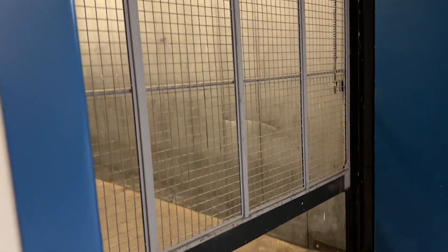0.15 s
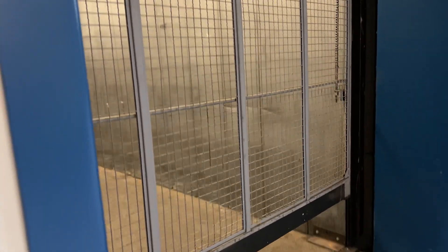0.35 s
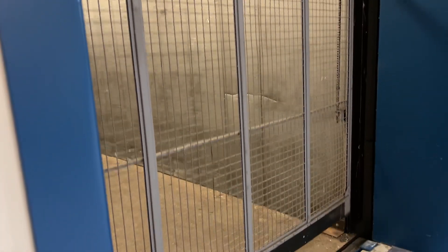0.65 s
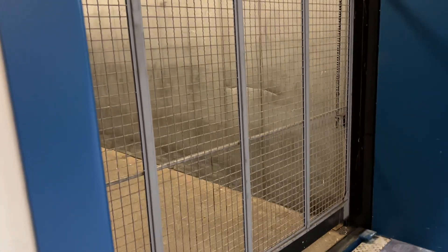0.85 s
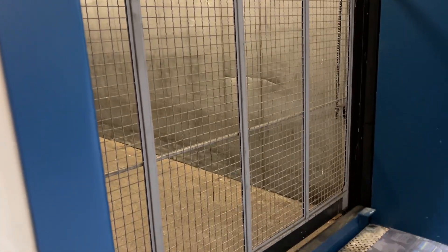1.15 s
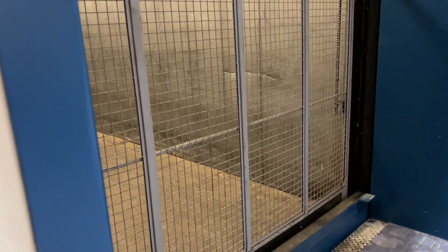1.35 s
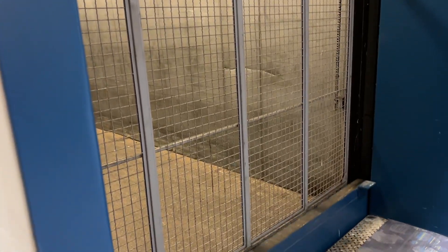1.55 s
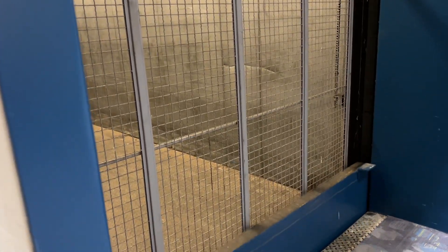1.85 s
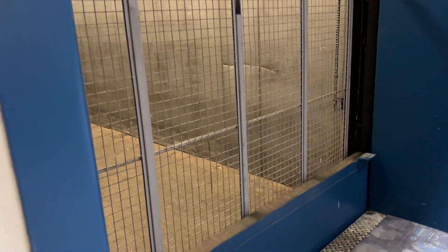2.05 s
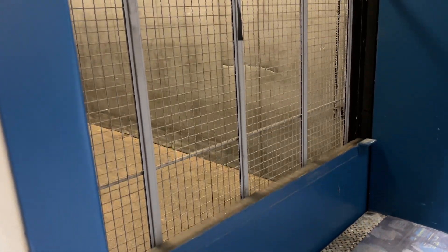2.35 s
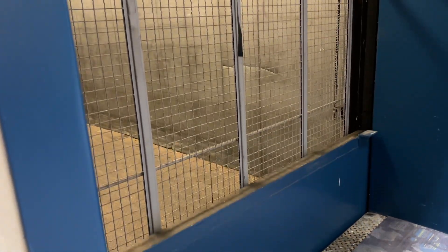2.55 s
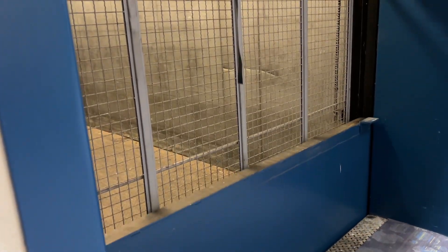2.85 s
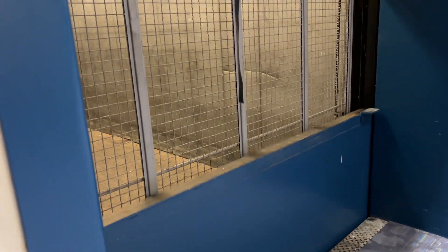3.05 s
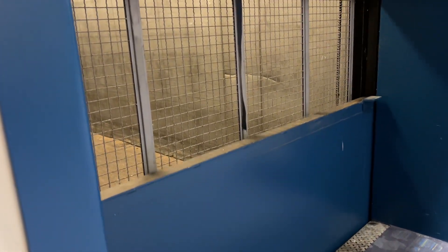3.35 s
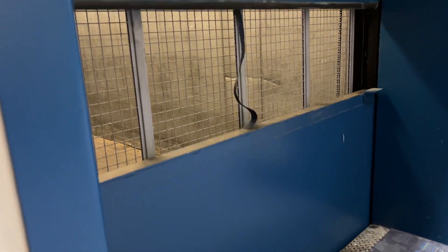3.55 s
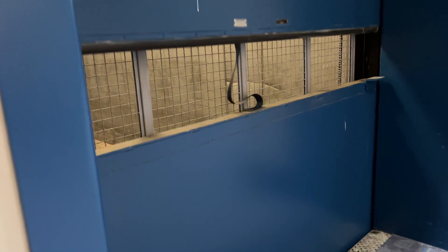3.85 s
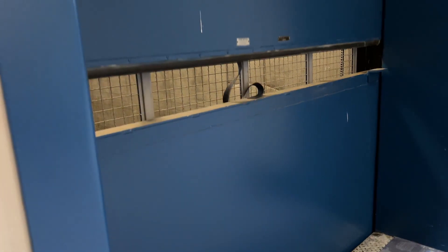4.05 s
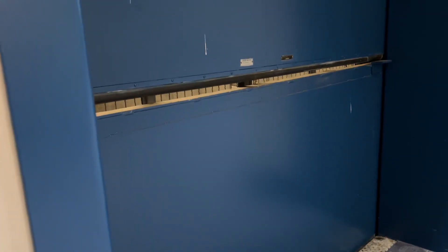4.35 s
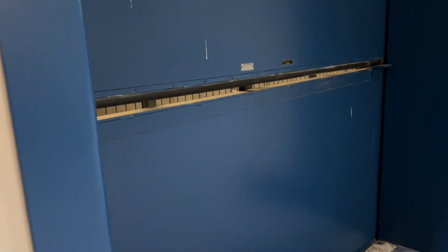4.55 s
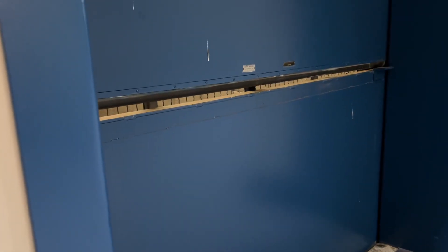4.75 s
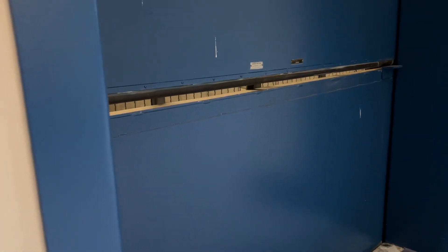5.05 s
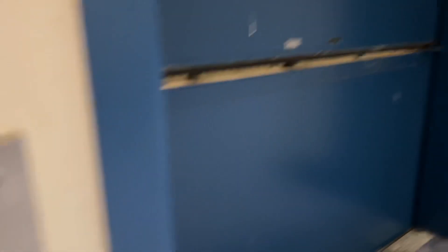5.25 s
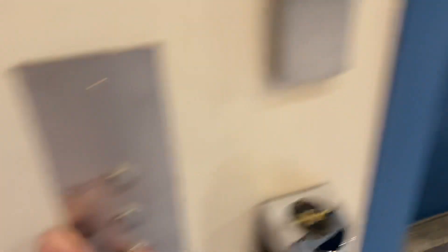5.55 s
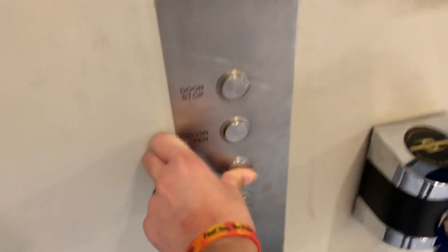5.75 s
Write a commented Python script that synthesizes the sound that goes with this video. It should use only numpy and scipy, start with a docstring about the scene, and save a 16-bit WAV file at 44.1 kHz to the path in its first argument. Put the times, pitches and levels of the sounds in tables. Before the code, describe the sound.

Heavy steel elevator doors close under a humming motor, with metallic clanks, a loud midway crash, a final bang and latch snap, then a button press.

```python
"""A mesh gate runs down on its chain over ventilation noise and an electrical hum, then lands and rings.
A motor runs up and draws two steel door panels together: its tones are multiples of its turning rate.
The panels' rumble, drone and scrape are filtered noise; they clang over a catch halfway and meet with a bang.
Blows are noise dying band by band in a large hard-walled building; small parts ring as damped modes.
The latch snaps home, and at last a button is pressed on its plate."""
import sys
import numpy as np
from scipy import signal
from scipy.fft import rfft, irfft, next_fast_len
from scipy.io import wavfile

SR = 44100
rng = np.random.default_rng(int(sys.argv[2]) if len(sys.argv) > 2 else 0)


def unload_audio(sound):
    """Save the sound as a 16-bit wav file, at the path given as the first command line argument."""
    columns = np.transpose(np.atleast_2d(sound))
    # keep every value between -1 and 1, then stretch to whole-number steps
    steps = np.round(np.clip(columns, -1, 1) * 32767)
    wavfile.write(sys.argv[1], SR, steps.astype(np.int16))


N = 260183

# Stereo width of the sound field: (frequency [Hz], side against mid [dB])
WIDTH = [(30, -13), (120, -17.5), (250, -11.5), (500, -6), (1000, -2.5), (2000, -1), (4000, -1), (5800, 0),
         (7500, -5.5), (9000, 3), (10300, -1), (11700, -1), (12600, -16), (14200, -16.5), (15200, -2.5)]
# Stereo balance: (frequency [Hz], left against right [dB])
LEFTWARD = [(60, -0.5), (250, -1.1), (500, 0.8), (1000, 1.5), (1600, 0.7), (2100, -1), (3900, 1),
            (5050, 8.5), (6000, 2.5), (7200, 1.5), (8200, 1), (9500, 0.5)]
# Resonances of the door sheets and their guide rails: (frequency [Hz], width [Hz], level [dB])
SHEET_PEAKS = [(97.6, 6.3, 9), (150, 2.4, 3.5), (285, 15, 1.5), (351, 120, 0.5), (407, 77, 5),
               (632, 4.9, 8), (806, 5.7, 1.5), (1014, 12, 2), (1095, 6.7, -1), (1406, 17, 2.5),
               (1345, 87, 6), (1458, 110, 8), (1720, 25, 6), (1940, 16, -4.5), (1800, 29, -4),
               (2210, 49, -5.5), (2280, 140, -5), (3760, 320, -0.5)]
# Range and strength of small parts' modes: (frequency [Hz], level per mode [dB])
CLINK_COLOUR = [(700, -3.5), (1500, 7), (2400, -1.5), (3300, -5), (5000, -14.5), (7000, -12.5)]
CLINK_T60_S, CLINK_SWELL_S = 0.07, 0.0016

# Ventilation spectrum: (frequency [Hz], density [dB per Hz])
AIR = [(20, -52.5), (35, -11), (60, 5.5), (90, -5.5), (140, -7.5), (220, -11.5), (330, -14.5), (480, -15.5),
       (650, -21.5), (1100, -27), (2200, -34), (3500, -42), (4600, -39.5), (5300, -38), (6500, -50.5),
       (9000, -64.5), (15500, -63)]
AIR_DB = -38.5
# Partials of the electrical hum: (frequency [Hz], level [dB])
MAINS_HUM = [(119.8, -50), (360.5, -58), (479.3, -54)]
# The hum grows as the microphone nears the button plate
HUM_NEAR_S, HUM_APPROACH_S, HUM_FAR_DB = 5.4, 0.5, -4.5

# Gate rollers' spectrum: (frequency [Hz], density [dB per Hz])
GATE_ROLL = [(20, -42), (35, -37), (75, 4), (120, 3.5), (200, -0.5), (400, -6.5), (490, -16.5), (610, -5),
             (750, -8.5), (1400, -19.5), (2200, -17), (2800, -24.5), (6000, -66)]
# Spectrum of the chain paying out: (frequency [Hz], density [dB per Hz])
CHAIN_HISS = [(1500, -16), (3000, 12), (5000, 6), (8000, 4), (11500, 0), (14000, -4.5), (15200, 3),
              (16000, -29)]
GATE_ROLL_DB, CHAIN_HISS_DB = -38, -61
# Tones of the gate's drive: (frequency [Hz], level [dB])
GATE_WHINE = [(199, -47.5), (633, -52.5), (716, -70), (1044, -61.5)]
# The gate lands and bounces: (time [s], level [dB])
GATE_LANDING = [(0.657, -37), (0.675, -49), (0.69, -51), (0.722, -52)]
# Modes of the gate's mesh: (frequency [Hz], level [dB], decay time T60 [s])
MESH_MODES = [(242.6, 9, 0.13), (298, 11.5, 0.12), (1415, 0, 0.24), (1950, -8, 0.61), (2440, -12, 0.19),
              (3140, -5, 0.2), (3420, -13, 0.15), (3962, -16, 0.4), (6500, -14, 0.95), (6760, -17.5, 0.8),
              (7140, -8, 0.16), (8560, -4, 0.076), (11600, -7, 0.049), (13180, -15, 0.1)]

# The gate's chain jingles: (time [s], level [dB], decay time T60 [s])
JINGLES = [(0.3, -66, 0.25), (0.47, -56, 0.2), (0.631, -50, 0.069), (2.325, -51, 0.12), (3.554, -59, 0.08)]
# Jingle spectrum: (frequency [Hz], density [dB per Hz])
JINGLE_COLOUR = [(3000, -17), (7000, -5), (12000, -13), (14000, 4), (16000, -14)]
# Small parts click: (time [s], level [dB])
CLICKS = [(0.468, -55), (0.688, -42), (0.719, -45), (0.746, -48), (2.324, -39), (3.351, -49),
          (3.554, -38.5), (4.583, -48.5)]
# Runs of chain links over the sprocket: (time [s], length [s], level [dB])
CHAIN_RUNS = [(3.175, 0.75, -52), (4.616, 0.27, -58.5)]
# Spectrum of clicks and links: (frequency [Hz], density [dB per Hz])
TICK_COLOUR = [(300, -38), (1000, 0), (2200, 10.5), (3500, -6.5), (5300, 7), (7000, 4), (8700, 0.5),
               (13000, -14), (16000, -31)]
CLICK_T60_S, LINK_T60_S = 0.066, 0.056
LINK_S = 0.026   # mean interval between links

# The door drive switches on, runs up to speed and, once the panels have met, runs down
START_S, ENGAGE_S, RUN_UP_S = 0.62, 0.016, 0.18
STOP_S, RUN_DOWN_DB_PER_S = 4.265, 23
# The motor runs up, then labours and eases with the load: (time [s], turning rate [Hz])
MOTOR_SPEED = [(0.62, 52), (0.95, 65), (1.25, 70.3), (1.55, 73), (2.0, 74.2), (2.6, 73.8), (3.05, 75.2),
               (3.3, 74.7), (3.8, 76.1), (4.1, 76.3), (4.3, 74.8), (4.9, 75.5)]
# One list for each of the first four orders, of its loud stretches: (level [dB], from [s], until [s])
MOTOR_ORDERS = [
    [(-34, 0.95, 1.4), (-36, 3.15, 4), (-32, 4.45, 5.0)],
    [(-37, 2.9, 2.2), (-31.5, 2.89, 3.1), (-31, 3.7, 3.88), (-31.5, 4.15, 4.75)],
    [(-35, 1.36, 2.28), (-33.5, 2.53, 2.89), (-38, 3.4, 3.85)],
    [(-34, 1.75, 2.55), (-31.5, 2.887, 3.21)],
]
ORDER_FADE_DB_PER_S, ORDER_RANGE_DB = 72, 14   # outside a stretch an order sinks this fast and this far

# Spectrum of the panels' rumble: (frequency [Hz], density [dB per Hz])
RUMBLE = [(20, -31), (33, -9.5), (45, -6.5), (62, 2.5), (85, 7.5), (115, 9.5), (160, 7.5), (220, -1.5),
          (500, -69)]
RUMBLE_DB, RUMBLE_GROWTH_DB_PER_S = -38.5, 2.07   # level at the start; growth afterwards
# The heavy panels shudder after a jolt: (time [s], level [dB])
SHUDDERS = [(0.68, -31.5), (2.39, -27.5), (3.3, -32.5), (4.28, -40.5)]
SHUDDER_RISE_S, SHUDDER_T60_S = 0.27, 1.8
# Spectrum of the rollers' drone: (frequency [Hz], density [dB per Hz])
DRONE = [(90, -30.5), (150, -15), (260, 1.5), (330, -0.5), (400, -7), (520, -10), (800, -25.5), (2000, -59)]
DRONE_DB, DRONE_SLOW_DB = -33.5, -13   # at full speed; change at starting speed
# Spectrum of the guide shoes' scraping: (frequency [Hz], density [dB per Hz])
SCRAPE = [(250, -23), (550, 1), (900, 2.5), (1150, -6), (1430, -10.5), (1700, -10), (2200, -6),
          (3200, -19.5), (5200, -24), (8000, -34), (13000, -53.5), (16000, -58)]
# Course of the scraping: (time [s], level [dB])
SCRAPE_LEVEL = [(0.65, -40.5), (0.95, -42.5), (1.2, -40.5), (1.65, -40), (2.25, -38), (2.9, -39),
                (3.3, -40), (3.8, -43), (4.05, -41.5), (4.4, -37)]
# Level of the moving panels' loudest clink; how far the others may fall below it
ROLLING_CLINK_DB, ROLLING_SPREAD_DB = -41, 10.5

# Steel blows: (time [s], level [dB], brightness [dB per octave], sizzle [dB], rise [s],
# ring T60 [s], hall against ring [dB])
BLOWS = [(0.643, -32.5, -1.5, 4, 0.0031, 0.22, -11.5), (0.655, -32, 5.5, 2, 0.003, 0.29, -19.5),
         (0.698, -30.5, -2, 0, 0.0038, 0.15, -20), (0.729, -30.5, -5.5, -1, 0.006, 0.24, -25),
         (2.315, -27.5, 0.3, 1, 0.007, 0.42, 3.5), (2.397, -15, 1, 9, 0.021, 0.66, -6.5),
         (2.50, -28.5, 1, -8, 0.029, 0.32, -10), (4.047, -40, 6, -12, 0.0023, 0.23, -9.5),
         (4.098, -29, -0.2, 7, 0.008, 0.28, -5.5), (4.151, -27, 3, -14, 0.01, 0.73, -16),
         (4.262, -21.5, 0.2, -12, 0.0063, 0.39, -15), (4.325, -28.5, -13, -3, 0.0076, 0.1, -8),
         (4.431, -53, 9.5, -15, 0.006, 0.33, -23)]
# Spectrum of struck sheet steel: (frequency [Hz], density [dB per Hz])
STEEL = [(22, -20.5), (40, 3), (90, -0.5), (180, 3), (340, 1.5), (560, -6.5), (900, -4.5), (1500, -12.5),
         (2200, -8.5), (2800, -16.5), (3700, -18), (4900, -24.5), (7000, -28), (12000, -35.5), (16000, -53)]
# Reverberation of the hall: (frequency [Hz], decay time T60 [s])
HALL_T60 = [(50, 2.2), (300, 1.76), (1500, 2.02), (4000, 1.1), (8000, 0.98), (15000, 0.68)]
BOOM_DB, BOOM_PER_DB, MEDIUM_BLOW_DB = 3, -0.75, -28.5   # light blows are mostly thud, hard ones mostly clang
# A brief low swell, mostly a panel at a low resonance, near 118 Hz the starting motor's hum: (time [s],
# frequency [Hz], level [dB], half length [s])
BOOMS = [(0.665, 275, -27.5, 0.0092), (0.736, 299, -28.5, 0.012), (0.87, 59, -30, 0.11),
         (1.135, 118.3, -27, 0.054), (1.36, 391.4, -33, 0.067), (1.57, 118, -29.5, 0.032),
         (1.73, 60.6, -30.5, 0.032), (2.03, 391, -34.5, 0.14), (2.12, 340.4, -32.5, 0.097),
         (2.5, 48.7, -27.5, 0.08), (2.55, 87.1, -18.5, 0.019), (3.28, 284, -28.5, 0.037),
         (3.64, 277.8, -32.5, 0.13), (3.7, 96, -49, 0.3), (3.75, 248.3, -35.5, 0.15),
         (4.2, 328, -28, 0.028), (4.28, 272, -29, 0.047), (4.285, 321, -25.5, 0.026),
         (4.335, 454, -28, 0.02)]

# After a jolt the gate's mesh rattles ever more weakly: (time [s], level [dB], fade [dB per s])
RATTLES = [(0.672, -34, 60), (2.43, -25, 52)]
# Spectrum of the wires' ticking: (frequency [Hz], density [dB per Hz])
RATTLE_COLOUR = [(500, -13.5), (1400, 3.5), (2300, 9), (3000, 2.5), (3700, 4.5), (5000, -11.5), (6600, -4),
                 (9000, -16), (14000, -28)]
RATTLE_GAP_S, RATTLE_T60_S = 0.02, 0.03
MESH_CLINK_DB = -2   # clinks against the wires' ticking

# Guide shoes scuff over rail joints: (time [s], level [dB], decay time T60 [s])
SCUFFS = [(1.19, -50, 0.3), (1.48, -45.5, 0.12), (1.535, -51, 0.13), (1.758, -42, 0.41), (1.884, -41, 0.27),
          (1.927, -41.5, 0.21), (1.998, -39, 0.26), (2.05, -45, 0.17), (2.15, -56, 0.25),
          (2.245, -53.5, 0.34), (3.55, -47, 0.11)]
# Scuff spectrum: (frequency [Hz], density [dB per Hz])
SCUFF_COLOUR = [(500, 3.5), (1400, 8), (2200, 12), (3500, 0.5), (5300, 0), (7500, -6.5), (9000, -9),
                (13000, -22.5), (16000, -32)]
# Guide shoes squeak: (time [s], frequency [Hz], level [dB], half length [s])
SQUEAKS = [(1.255, 4307, -58, 0.04), (1.265, 6030, -64, 0.05), (1.77, 1997, -43, 0.024),
           (1.82, 2010, -52, 0.04), (1.92, 1680, -50.5, 0.044), (1.94, 2037, -54.5, 0.11),
           (4.125, 2180, -41, 0.015)]

# The panels knock against the catch and their stops: (time [s], level [dB], decay time T60 [s])
KNOCKS = [(2.368, -37, 0.06), (2.392, -27, 0.044), (2.413, -30, 0.06), (2.424, -34, 0.05),
          (2.444, -26, 0.085), (2.492, -31, 0.078), (2.515, -35, 0.05), (2.543, -31.5, 0.096),
          (2.61, -32, 0.05), (2.665, -39, 0.045), (4.108, -42.5, 0.05), (4.163, -28.5, 0.06),
          (4.186, -26.5, 0.05)]
# Spectrum of the knocks' crack: (frequency [Hz], density [dB per Hz])
KNOCK_COLOUR = [(150, -8), (350, 2), (600, 2), (1500, 6.5), (2500, -15), (3800, -7), (5500, -7),
                (12000, -42)]
# Modes of a knocked panel: (frequency [Hz], level [dB], decay time T60 [s])
PANEL_MODES = [(320.6, 3, 0.22), (341, -4, 0.47), (445, -8, 0.16), (605.6, -5.5, 0.31), (902, -12, 0.29),
               (1090, -5.5, 0.3), (1320, -9.5, 0.2), (1610, -8, 0.3), (1787, -5.5, 0.15), (1980, -13, 0.3),
               (2500, -16.5, 0.3)]

# The latch snaps home: (time [s], level [dB], decay time T60 [s])
LATCH = [(4.153, -30.5, 0.1), (4.257, -25, 0.082), (4.265, -17.5, 0.035)]
# Spectrum of the latch's click: (frequency [Hz], density [dB per Hz])
LATCH_COLOUR = [(2000, -5.5), (3300, -25), (4400, -4), (5100, -4), (5600, -3), (6500, 5.5), (7700, -12),
                (8700, 2.5), (10500, -8), (11500, -26), (12800, -12.5), (14200, -26), (15100, -17.5),
                (16000, -17.5)]
# Modes of the latch: (frequency [Hz], level [dB], decay time T60 [s])
LATCH_MODES = [(4550, -19, 0.15), (5090, -12, 0.12), (6300, -8.5, 0.12), (6840, -9, 0.079),
               (8050, -11, 0.12), (9130, -8, 0.068), (12100, -16.5, 0.035), (12950, -9, 0.052),
               (13400, -24.5, 0.09), (15000, -23, 0.062)]

# The panels' edges slam together and rebound: (time [s], level [dB], decay time T60 [s])
SLAMS = [(4.266, -23.5, 0.04), (4.278, -26.5, 0.04), (4.292, -27, 0.05), (4.341, -35, 0.068)]
# Modes of the steel edges: (frequency [Hz], level [dB], decay time T60 [s])
EDGE_MODES = [(268, -5, 0.2), (425.7, -4.5, 0.45), (563, -5, 0.23), (797, -5.5, 0.3), (1033, -22, 0.3),
              (1303, -15, 0.37), (1360, -15.5, 0.15), (1765, -10.5, 0.23), (1867, -6.5, 0.277),
              (1900, -14, 0.14), (2040, -7.5, 0.13), (2180, -10.5, 0.18), (2320, -7, 0.14)]
SLAM_CRACK_DB = 1

# A hand presses the button and knocks on its plate: (time [s], level [dB], decay time T60 [s])
BUTTON = [(5.693, -38, 0.05), (5.707, -37.5, 0.07), (5.883, -42, 0.15)]
# Button spectrum: (frequency [Hz], density [dB per Hz])
BUTTON_COLOUR = [(200, 13), (700, 9), (1400, -3), (2200, 0), (2700, -11), (3300, -2.5), (4500, -16),
                 (7500, -20.5), (15000, -28)]

CUTOFF_HZ = 15600


def from_db(db):
    """A level in decibels corresponds to an amplitude ratio of 10 to the power level / 20."""
    return 10 ** (np.asarray(db) / 20)


def rms_one(x):
    """Dividing a signal by its root mean square gives it unit power."""
    return x / np.sqrt(np.mean(x ** 2) + 1e-20)


def clock():
    """The time of a sample is its index divided by the sampling rate [s]."""
    return np.arange(N) / SR


def in_time(rows):
    """Slow changes are interpolated linearly in time, one curve per column."""
    s, *columns = np.transpose(rows)
    return [np.interp(clock(), s, column) for column in columns]


def at_hz(points, hz):
    """Spectra are interpolated along logarithmic frequency."""
    f, value = np.transpose(points)
    return np.interp(np.log(np.maximum(hz, 1)), np.log(f), value)


def drift(rate):
    """Low-passed noise wanders smoothly about zero with unit spread; rate is its bandwidth [Hz]."""
    # computed at every 100th sample; the first 1000 values let the filter settle
    r = np.exp(-200 * np.pi * rate / SR)
    noise = rng.standard_normal(N // 100 + 1002)
    slow = rms_one(signal.lfilter([1], [1, -2 * r, r * r], noise)[1000:])
    return np.interp(np.arange(N) / 100, np.arange(len(slow)), slow)


def sheet_response(hz, uneven_db, spacing_hz):
    """Steel answers unevenly: a few strong resonances among crowds of weak ones."""
    peaks = sum(db / (1 + (2 * (hz - centre) / width) ** 2) for centre, width, db in SHEET_PEAKS)
    # the weak resonances stand further apart and stronger towards the treble... in log1p steps
    place = np.log1p(hz / 1500) * 1500 / spacing_hz
    crowd = np.interp(place, np.arange(2000), rng.standard_normal(2000))
    return from_db(peaks + uneven_db * crowd * hz / (hz + 700))


def diffuse(spectrum, steel=0):
    """A diffuse field: unit-power noise, shared by the ears where narrow; steel scales the sheets' colour."""
    size = next_fast_len(N)
    hz = np.fft.rfftfreq(size, 1 / SR)
    mid, side = rfft(rng.standard_normal((2, size)))
    width = from_db(at_hz(WIDTH, hz))
    gain = from_db(at_hz(spectrum, hz)) / np.sqrt(1 + width ** 2)
    if steel:
        gain = gain * sheet_response(hz, uneven_db=4.0, spacing_hz=16) ** steel
    left = from_db(at_hz(LEFTWARD, hz) / 2)
    ears = np.array([(mid + width * side) * left, (mid - width * side) / left])
    return rms_one(irfft(gain * ears, size)[:, :N])


def octaves(x):
    """Overlapping octave bands add up to the whole; yields each centre [Hz] and its band."""
    size = next_fast_len(N)
    centres = 62.5 * 2.0 ** np.arange(9)
    whole, hz = rfft(x, size), np.fft.rfftfreq(size, 1 / SR)
    for centre, share in zip(centres, np.eye(len(centres))):
        yield centre, irfft(whole * at_hz(np.c_[centres, share], hz), size)[:, :N]


def dying(t, start, rise, t60):
    """Power builds up, then decays exponentially by 60 dB in each T60."""
    age = t - start
    decay = np.log(1e6) * np.maximum(age - rise, 0) / t60
    return np.clip(age / rise, 0, 1) ** 2 * np.exp(-np.minimum(decay, 60))


def struck(hits, modes, scatter_db, split):
    """Modal excitation: each hit rings every mode by its own amount; modes come in close pairs that beat."""
    at, out = [round(s * SR) for s, *_ in hits], np.zeros((2, N))
    hit_db = np.array(hits)[:, 1]
    for hz, mode_db, t60 in modes:
        width = from_db(at_hz(WIDTH, hz))
        for twin_hz in (hz * (1 - split), hz * (1 + split)):
            chance, mid, side = rng.normal(0, 1, (len(at), 3)).T
            ears = np.sign(mid) + width * np.sign(side) * [[1], [-1]]
            ears = ears / np.sqrt(2 + 2 * width ** 2)
            impulses = np.full((2, N), 1e-18)   # inaudible floor
            impulses[:, at] = from_db(hit_db + mode_db + scatter_db * chance) * ears
            # two-pole resonator: a decaying sine for each impulse
            r, w = from_db(-60 / (t60 * SR)), 2 * np.pi * twin_hz / SR
            out += signal.lfilter([0, np.sin(w)], [1, -2 * r * np.cos(w), r * r], impulses)
    return out


def ticks(rows, colour, rise_s, hall_db, hall_s):
    """Small metal contacts radiate a short noise burst, followed by a faint reverberant tail."""
    t = clock()[::16]
    power = 0
    for s, db, t60 in rows:
        tail = from_db(hall_db) ** 2 * dying(t, s, 0.01, hall_s)
        power = power + from_db(db) ** 2 * (dying(t, s, rise_s, t60) + tail)
    return np.interp(clock(), t, np.sqrt(power)) * diffuse(colour, steel=0.5)


def clinks(hits, count):
    """Every contact rings a different small part, a superposition of a few modes of its own."""
    t = np.arange(SR // 6) / SR
    out, fade = np.zeros((2, N + len(t))), np.sqrt(dying(t, 0, CLINK_SWELL_S, CLINK_T60_S))
    lowest, highest = CLINK_COLOUR[0][0], CLINK_COLOUR[-1][0]
    for s, db, *_ in hits:
        pitch, left, right = rng.random((3, count, 1))
        hz = lowest * (highest / lowest) ** pitch
        phase = 2 * np.pi * (hz * t + np.array([left, right]))
        ring = (from_db(at_hz(CLINK_COLOUR, hz)) * np.sin(phase)).sum(axis=1)
        at = min(int(s * SR), N)
        out[:, at:at + len(t)] += from_db(db) * fade * rms_one(ring)
    return out[:, :N]


def tones(rows, waver_db, wobble):
    """Steady machine tones are sinusoids whose level and phase waver a little."""
    out = 0
    for hz, db in rows:
        level = np.sqrt(2) * from_db(db + waver_db * drift(3.3))
        out = out + level * np.sin(2 * np.pi * (hz * clock() + rng.random()) + wobble * drift(10))
    return out


def swells(rows, wobble, wobble_rate):
    """A resonance fed for a moment: a tone of wavering phase under a bell-shaped envelope."""
    t, out = clock(), 0
    for s, hz, db, half in rows:
        bell = np.exp(-np.minimum(((t - s) / half) ** 2, 50))
        tone = np.sin(2 * np.pi * hz * t + wobble * drift(wobble_rate))
        out = out + np.sqrt(2) * from_db(db) * bell * tone
    return out


def building(waver_db):
    """Ventilation is broadband noise; the electrical hum is tonal and strongest by the button plate."""
    far = np.clip((HUM_NEAR_S - clock()) / HUM_APPROACH_S, 0, 1)
    hum = from_db(HUM_FAR_DB * far) * tones(MAINS_HUM, waver_db, wobble=0)
    return from_db(AIR_DB) * diffuse(AIR) + hum


def gate(rattle_db, stop_s):
    """Rolling contact makes noise until the gate lands; the impact then rings the modes of its mesh."""
    landed = (clock() - GATE_LANDING[0][0]) / stop_s
    running = from_db(-60 * np.clip(landed, 0, 2))
    rollers = from_db(GATE_ROLL_DB) * diffuse(GATE_ROLL, steel=0.89)
    chain = from_db(CHAIN_HISS_DB + rattle_db * drift(25)) * diffuse(CHAIN_HISS)
    whine = tones(GATE_WHINE, waver_db=0.5, wobble=0.87)
    landing = struck(GATE_LANDING, MESH_MODES, scatter_db=3.0, split=0.0072)
    return running * (rollers + chain + whine) + landing


def chain_jingle():
    """Links striking one another give bright bursts of noise."""
    return ticks(JINGLES, JINGLE_COLOUR, rise_s=0.003, hall_db=-19, hall_s=0.4)


def chain_links(jitter_s, scatter_db, count):
    """A sprocket gives one tick per link, uneven in time and strength: (time [s], level [dB], T60 [s])."""
    rows = []
    for s, length, db in CHAIN_RUNS:
        for k, (late, strong) in enumerate(rng.standard_normal((count, 2))):
            if k * LINK_S < length:
                rows.append((s + k * LINK_S + jitter_s * late, db + scatter_db * strong, LINK_T60_S))
    return rows


def small_contacts():
    """Clicking parts and chain links are brief impacts of one common colour."""
    contacts = [(s, db, CLICK_T60_S) for s, db in CLICKS]
    contacts += chain_links(jitter_s=0.0059, scatter_db=2.0, count=29)
    return ticks(contacts, TICK_COLOUR, rise_s=0.0013, hall_db=-11, hall_s=0.41)


def drive_state():
    """The run-up is exponential: seconds since the start, share still to go, gain from on to run-down."""
    age = np.maximum(clock() - START_S, 0)
    run_down = from_db(-RUN_DOWN_DB_PER_S * np.maximum(clock() - STOP_S, 0))
    return age, np.exp(-age / RUN_UP_S), np.minimum(age / ENGAGE_S, 1) * run_down


def motor(waver_db, wobble, flutter):
    """Orders are whole multiples of the turning rate; the panels radiate each over its own stretches."""
    t, out = clock(), 0
    _, _, moving = drive_state()
    speed, = in_time(MOTOR_SPEED)
    # uneven load roughens the high orders most
    turn = 2 * np.pi * np.cumsum(speed) / SR + flutter * drift(12)
    for order, stretches in enumerate(MOTOR_ORDERS, 1):
        levels = []
        for db, from_s, until_s in stretches:
            outside_s = np.abs(t - np.clip(t, from_s, until_s))
            levels.append(db - np.minimum(ORDER_FADE_DB_PER_S * outside_s, ORDER_RANGE_DB))
        level_db = np.max(levels, axis=0) + waver_db * drift(9.1)
        out = out + from_db(level_db) * np.sin(order * turn + wobble * drift(2.5))
    return np.sqrt(2) * moving * out


def panels(uneven_db):
    """Moving panels rumble, their rollers drone and friction at the shoes scrapes unevenly on the guides."""
    age, slow, moving = drive_state()
    shudder = 0
    for s, db in SHUDDERS:
        shudder = shudder + from_db(db) ** 2 * dying(clock(), s, SHUDDER_RISE_S, SHUDDER_T60_S)
    rolling = moving * from_db(RUMBLE_DB + RUMBLE_GROWTH_DB_PER_S * age)
    rumble = np.sqrt(rolling ** 2 + shudder) * diffuse(RUMBLE)   # powers add
    drone = from_db(DRONE_DB + DRONE_SLOW_DB * slow) * diffuse(DRONE, steel=0.42)
    scrape_db, = in_time(SCRAPE_LEVEL)
    scrape = from_db(scrape_db + uneven_db * drift(12.6)) * diffuse(SCRAPE, steel=1.0)
    return rumble + moving * (drone + scrape)


def rolling_rattle(count):
    """Loose parts clink at random moments, most of them faintly, while the panels travel."""
    when, strength = rng.random((count, 2)).T
    times = START_S + (STOP_S - START_S) * (np.arange(count) + when) / count
    levels = ROLLING_CLINK_DB - ROLLING_SPREAD_DB * np.sqrt(strength)
    return clinks(zip(times, levels), count=8)


def blows(boom_hz, pivot_hz, damping, hall_rise_s, chatter_db):
    """Large sheets have countless modes: each blow is a crash that dies by band and hangs in the hall."""
    t, out = clock()[::16], 0
    chatter = from_db(chatter_db * drift(170)) ** 2   # loose parts slap while the sheet rings
    chatter = np.interp(t, clock(), chatter)
    for hz, band in octaves(diffuse(STEEL, steel=0.81)):
        power = 0
        for s, db, bright_db, sizzle_db, rise, t60, hall_db in BLOWS:
            boom_db = BOOM_DB + BOOM_PER_DB * max(db - MEDIUM_BLOW_DB, 0)
            level_db = db + boom_db / (1 + (hz / boom_hz) ** 2)
            level_db = level_db + bright_db * np.log2(max(hz / pivot_hz, 1))
            level_db = level_db + sizzle_db * (hz > SR / 4)   # sharp edges excite the top octave
            band_rise = rise * max(pivot_hz / hz, 1) ** .5
            band_t60 = t60 * (pivot_hz / hz) ** damping
            ring = chatter * dying(t, s, band_rise, band_t60)
            hall = from_db(hall_db) ** 2 * dying(t, s, hall_rise_s, at_hz(HALL_T60, hz))
            power = power + from_db(level_db) ** 2 * (ring + hall)
        out = out + band * np.interp(clock(), t, np.sqrt(power))
    return out


def panel_booms():
    """A panel stores energy at a low resonance and swells there briefly; near 118 Hz the starting motor hums."""
    return swells(BOOMS, wobble=0.38, wobble_rate=4.9)


def mesh_rattle(count):
    """Loose wires make repeated contact at uneven intervals and with uneven, fading strength."""
    rows = []
    for s, db, fade in RATTLES:
        late, weak = rng.random((count, 2)).T
        ages = RATTLE_GAP_S * (np.arange(count) + late)
        rows += [(s + age, db - fade * age - 6 * w, RATTLE_T60_S) for age, w in zip(ages, weak)]
    ticking = ticks(rows, RATTLE_COLOUR, rise_s=0.001, hall_db=-14, hall_s=0.66)
    return ticking + from_db(MESH_CLINK_DB) * clinks(rows, count=10)


def shoe_scuffs():
    """Sliding over a rail joint gives a burst of friction noise."""
    return ticks(SCUFFS, SCUFF_COLOUR, rise_s=0.0067, hall_db=-10.5, hall_s=0.82)


def shoe_squeaks():
    """Friction feeds one resonance of a guide shoe for a moment."""
    return swells(SQUEAKS, wobble=0.35, wobble_rate=22)


def panel_knocks():
    """Impact excitation: each knock is a short crack that sets the panel's modes ringing."""
    crack = ticks(KNOCKS, KNOCK_COLOUR, rise_s=0.0074, hall_db=-22.5, hall_s=0.41)
    return crack + struck(KNOCKS, PANEL_MODES, scatter_db=1.5, split=0.014)


def latch_snap():
    """A small stiff part clicks and rings in high, quickly damped modes."""
    click = ticks(LATCH, LATCH_COLOUR, rise_s=0.0047, hall_db=-20.0, hall_s=0.4)
    return click + struck(LATCH, LATCH_MODES, scatter_db=-1.5, split=0.0064)


def slam():
    """The panels collide: a crack and the dense modal clank of their steel edges."""
    crack = ticks(SLAMS, KNOCK_COLOUR, rise_s=0.0013, hall_db=-21.5, hall_s=0.416)
    return from_db(SLAM_CRACK_DB) * crack + struck(SLAMS, EDGE_MODES, scatter_db=0.0, split=0.0076)


def button_press():
    """A hand's light impacts on button and plate give short bursts of noise."""
    return ticks(BUTTON, BUTTON_COLOUR, rise_s=0.0058, hall_db=-16, hall_s=0.75)


def scene():
    """Superposition: the sound pressures of all sources add."""
    out = building(waver_db=-2.0) + gate(rattle_db=1.5, stop_s=0.78)
    out = out + chain_jingle() + small_contacts()
    out = out + motor(waver_db=1.5, wobble=0.22, flutter=0.06)
    out = out + panels(uneven_db=1.17) + rolling_rattle(count=50)
    out = out + blows(boom_hz=385, pivot_hz=950, damping=0.4, hall_rise_s=0.02, chatter_db=0.5)
    out = out + panel_booms() + mesh_rattle(count=20)
    out = out + shoe_scuffs() + shoe_squeaks()
    return out + panel_knocks() + latch_snap() + slam() + button_press()


def record(dry):
    """Near 10 kHz two microphones are out of phase, so their common part cancels; the top is cut."""
    dip = signal.butter(4, [9150, 11300], "bandstop", fs=SR, output="sos")
    top = signal.ellip(10, 0.2, 90, CUTOFF_HZ, fs=SR, output="sos")
    mid = dry.mean(axis=0)
    side = dry - mid
    return signal.sosfilt(top, side + signal.sosfiltfilt(dip, mid))


dry = scene()
out = record(dry)
unload_audio(out)
```